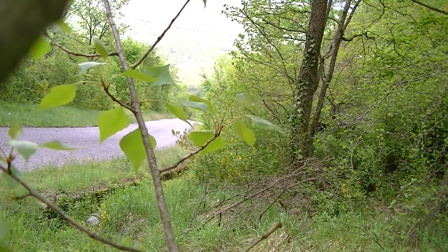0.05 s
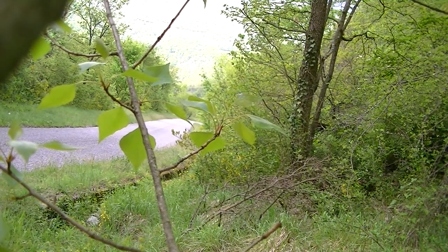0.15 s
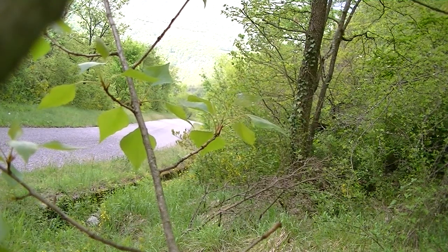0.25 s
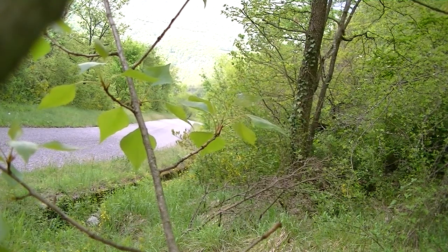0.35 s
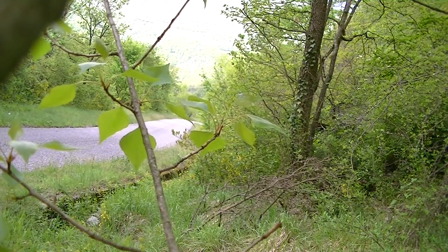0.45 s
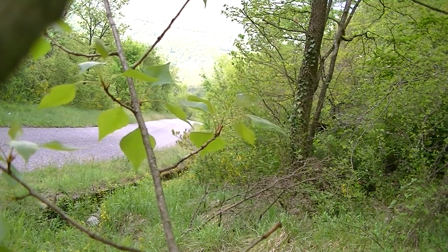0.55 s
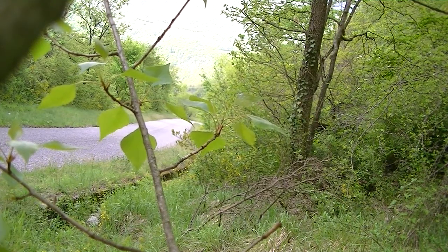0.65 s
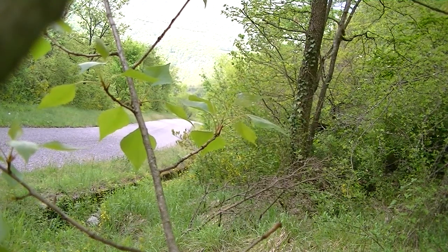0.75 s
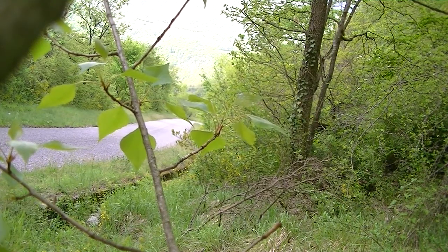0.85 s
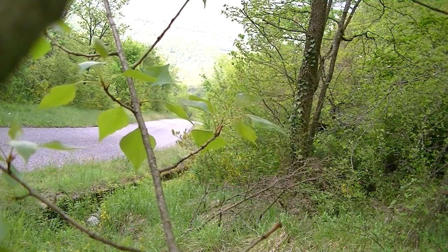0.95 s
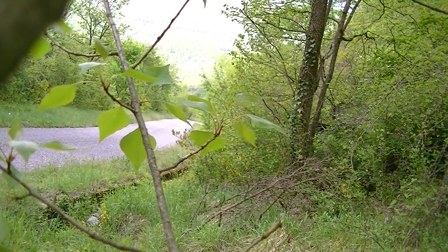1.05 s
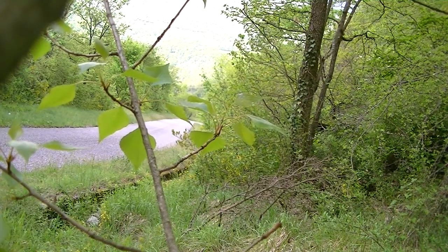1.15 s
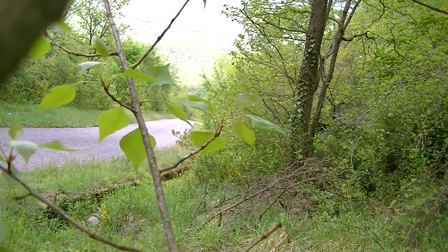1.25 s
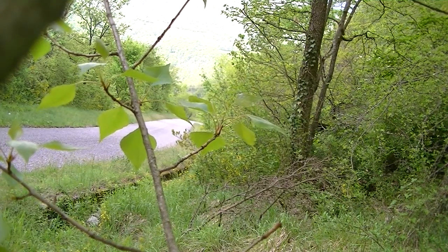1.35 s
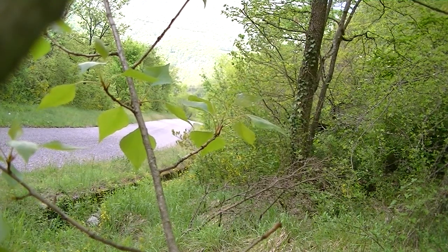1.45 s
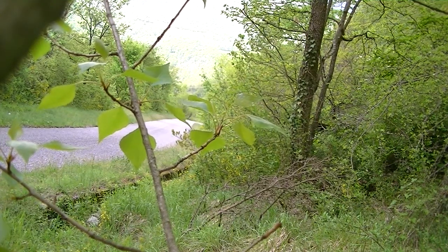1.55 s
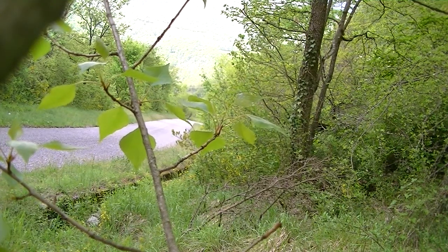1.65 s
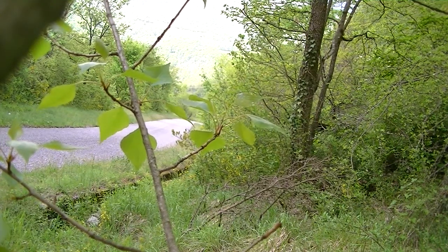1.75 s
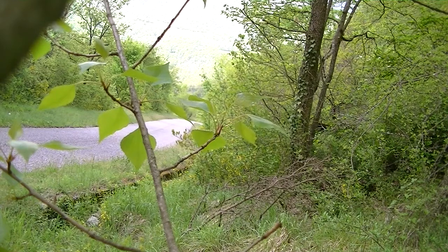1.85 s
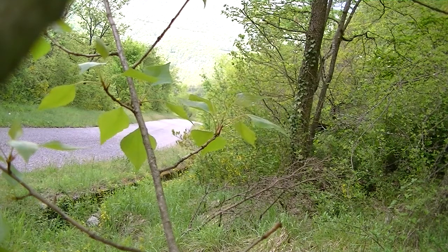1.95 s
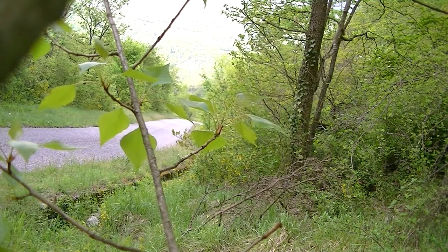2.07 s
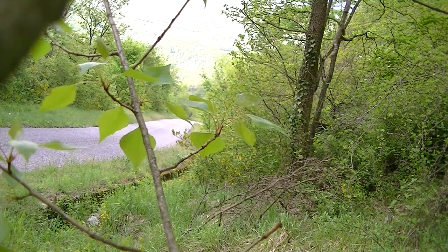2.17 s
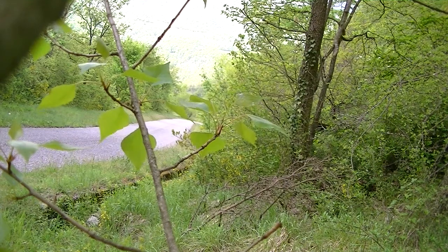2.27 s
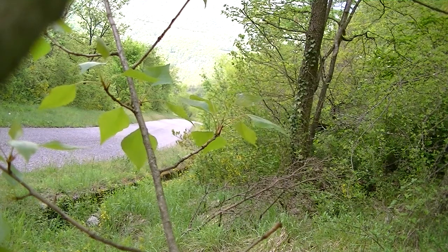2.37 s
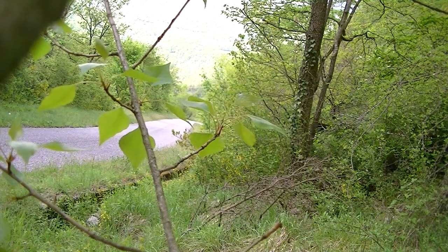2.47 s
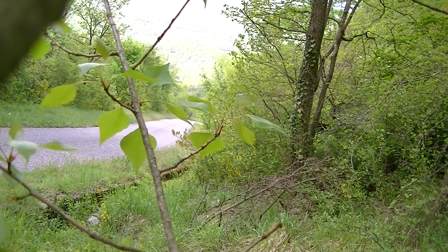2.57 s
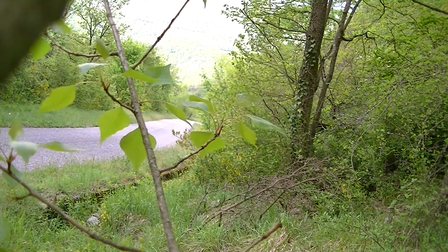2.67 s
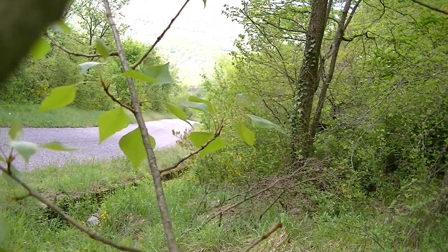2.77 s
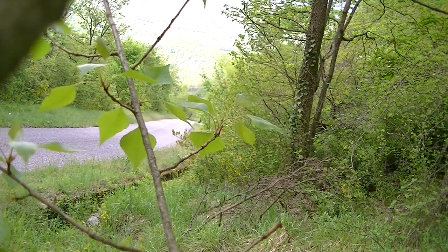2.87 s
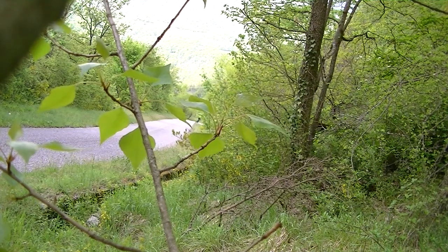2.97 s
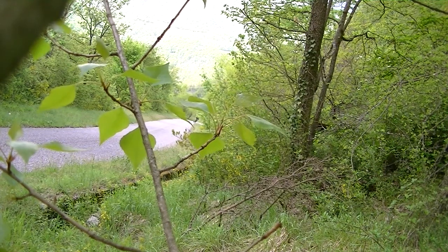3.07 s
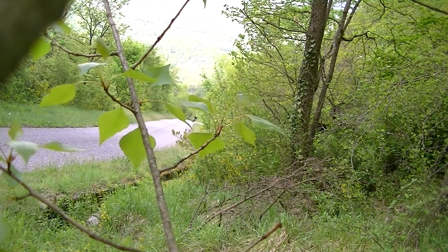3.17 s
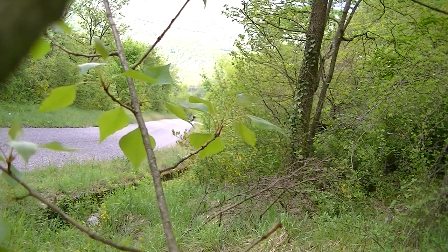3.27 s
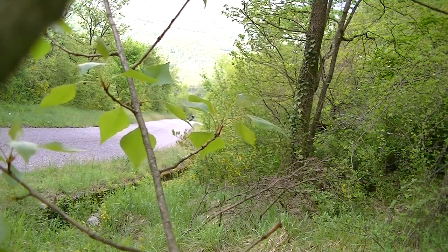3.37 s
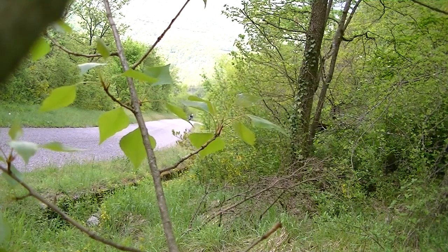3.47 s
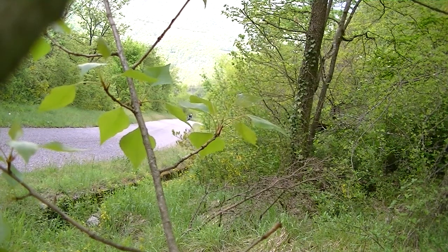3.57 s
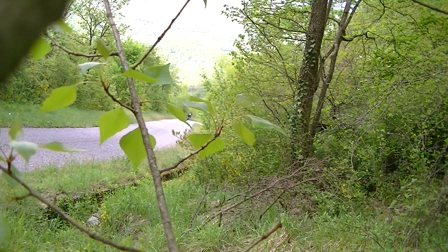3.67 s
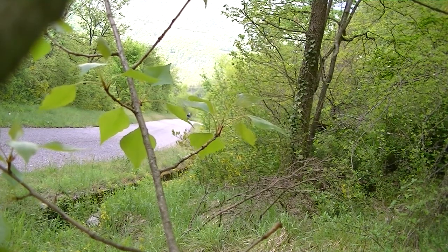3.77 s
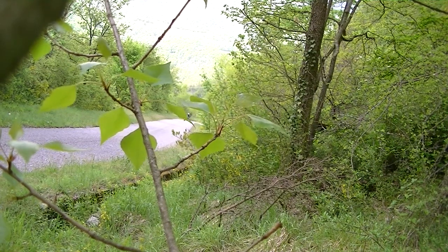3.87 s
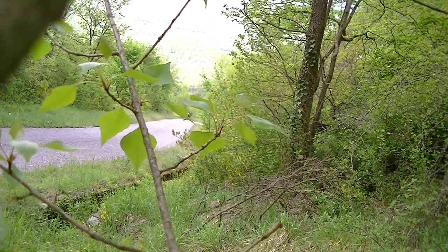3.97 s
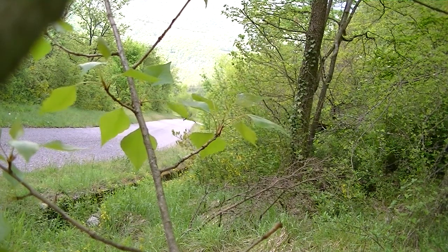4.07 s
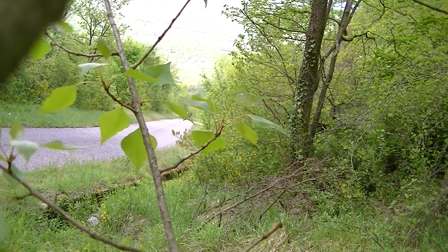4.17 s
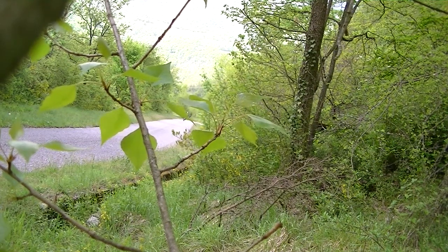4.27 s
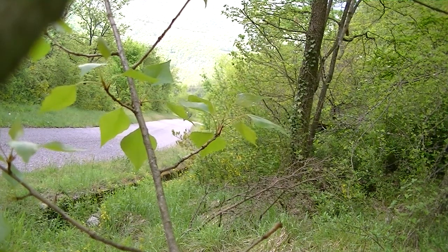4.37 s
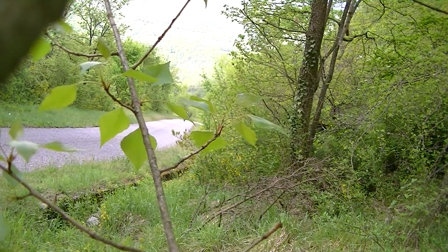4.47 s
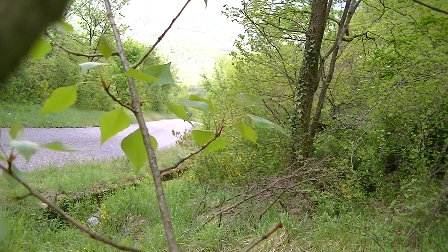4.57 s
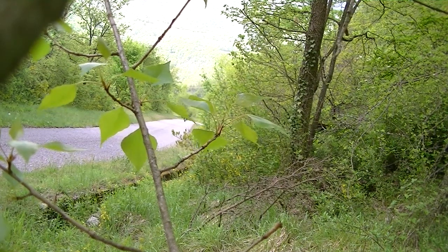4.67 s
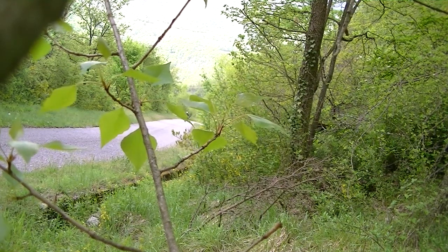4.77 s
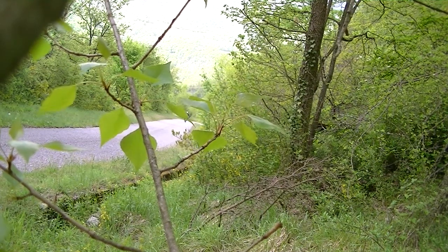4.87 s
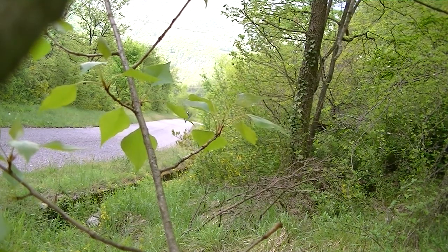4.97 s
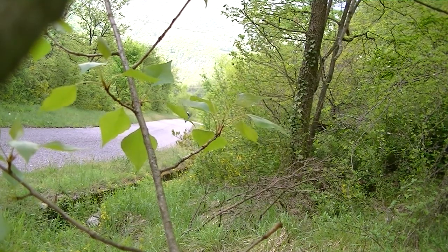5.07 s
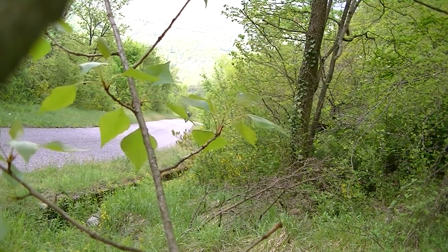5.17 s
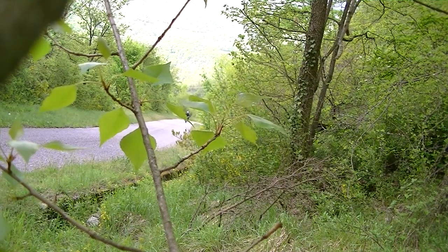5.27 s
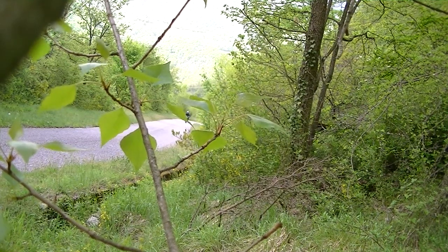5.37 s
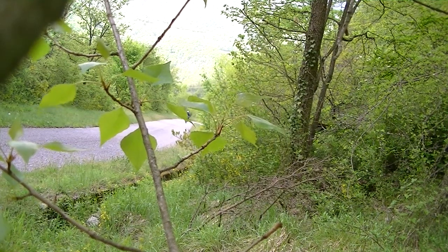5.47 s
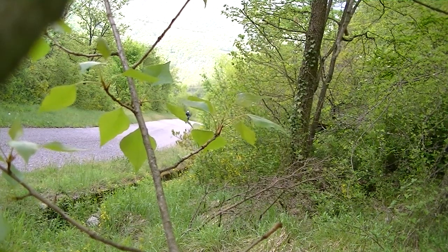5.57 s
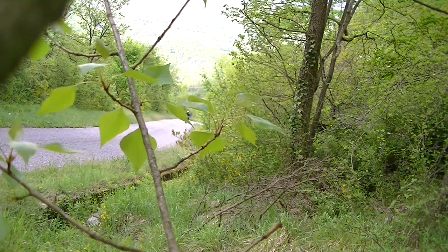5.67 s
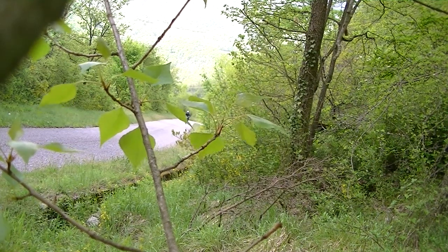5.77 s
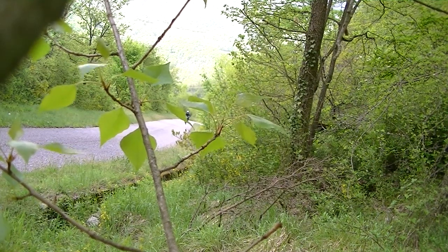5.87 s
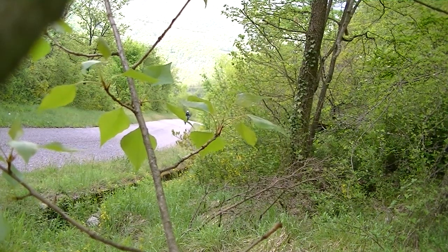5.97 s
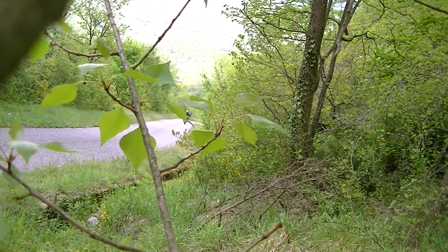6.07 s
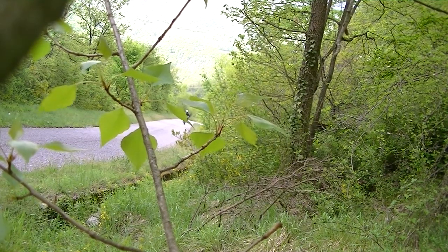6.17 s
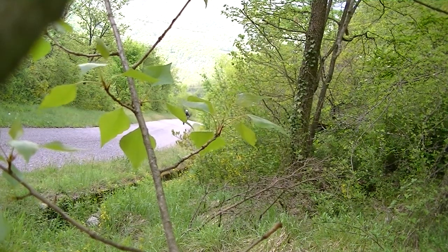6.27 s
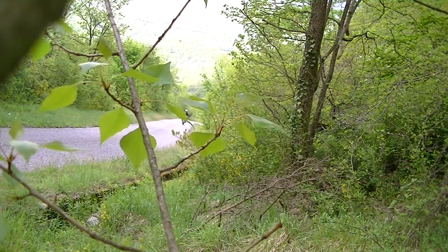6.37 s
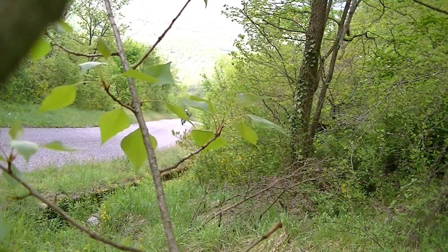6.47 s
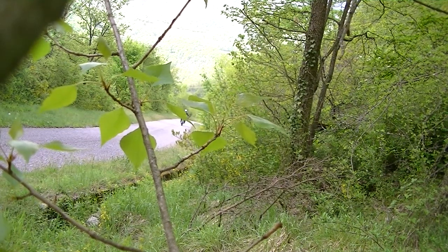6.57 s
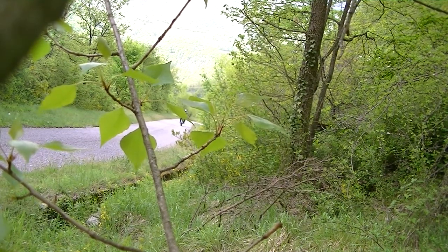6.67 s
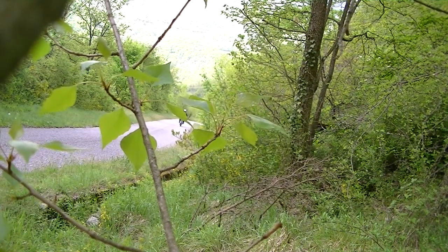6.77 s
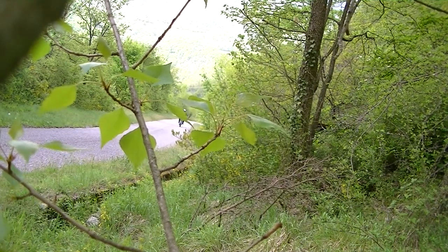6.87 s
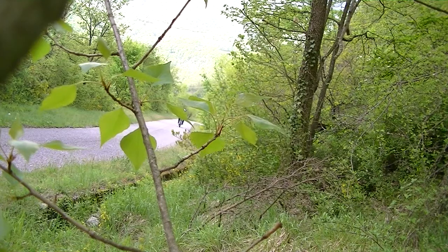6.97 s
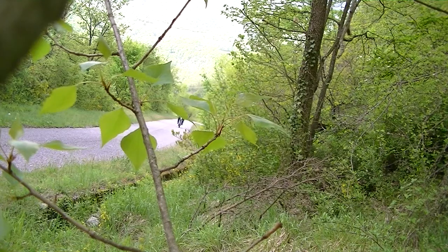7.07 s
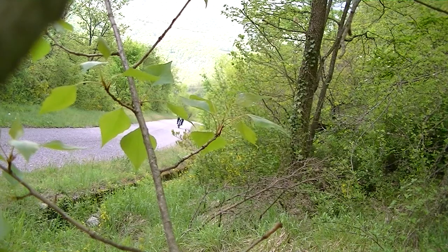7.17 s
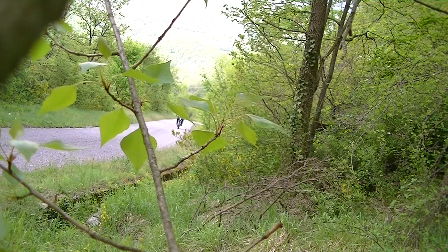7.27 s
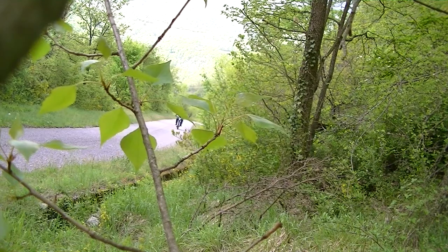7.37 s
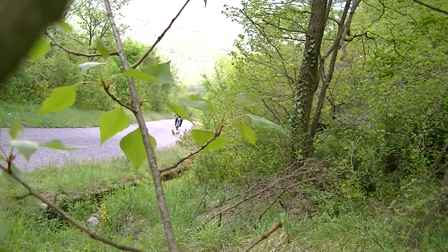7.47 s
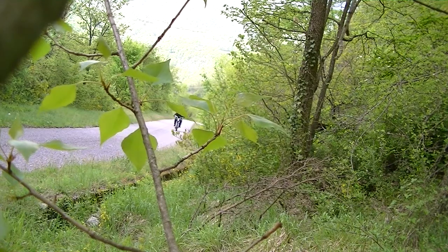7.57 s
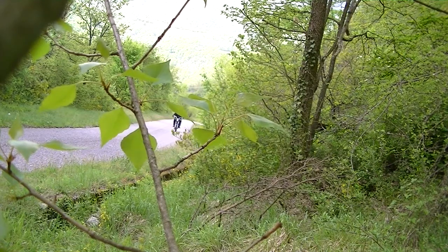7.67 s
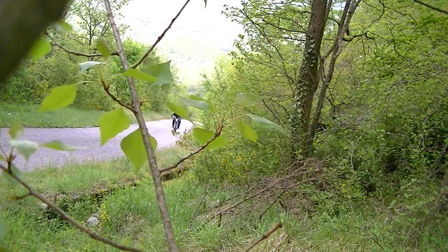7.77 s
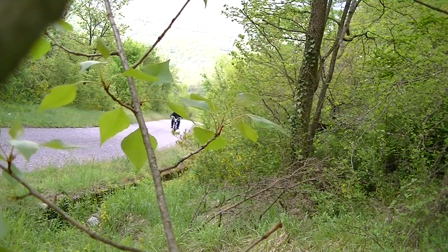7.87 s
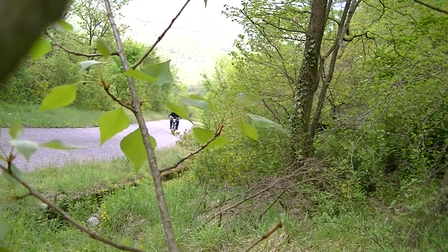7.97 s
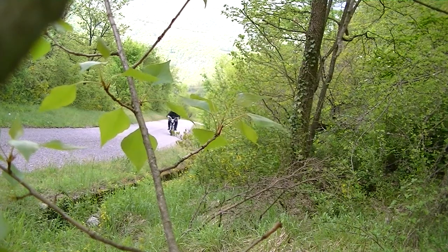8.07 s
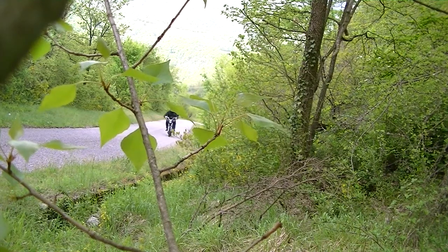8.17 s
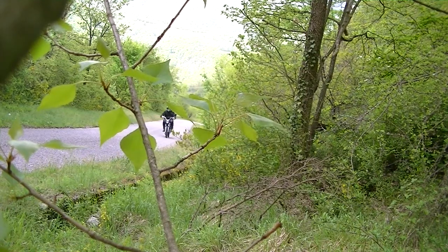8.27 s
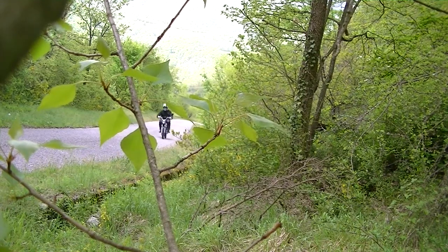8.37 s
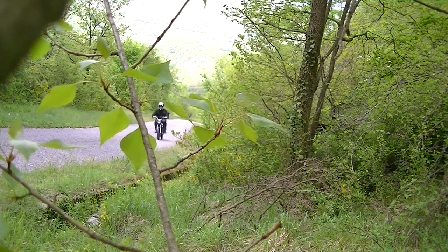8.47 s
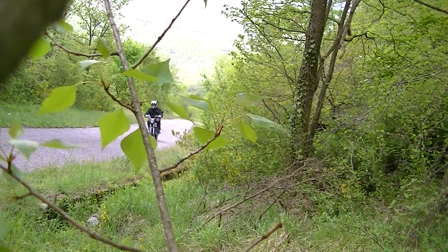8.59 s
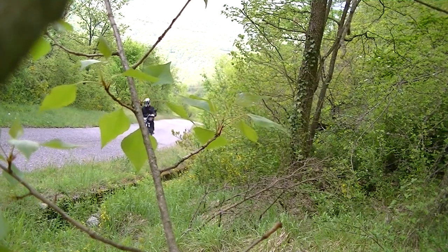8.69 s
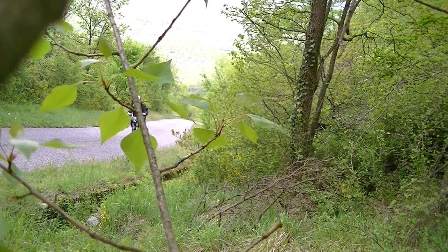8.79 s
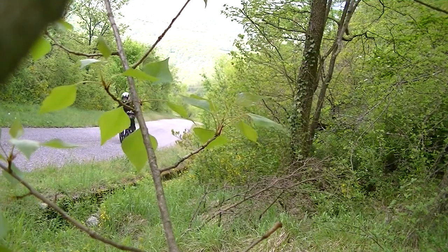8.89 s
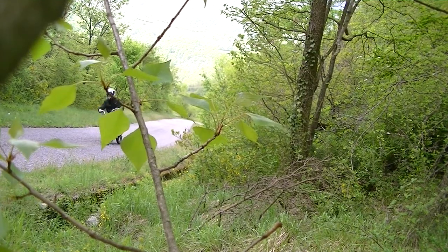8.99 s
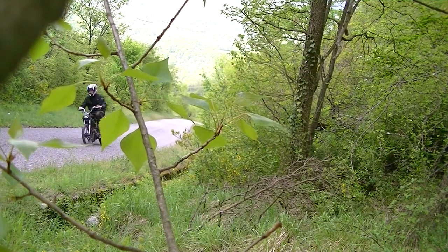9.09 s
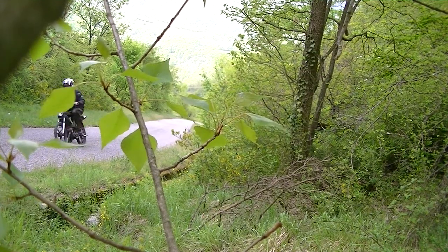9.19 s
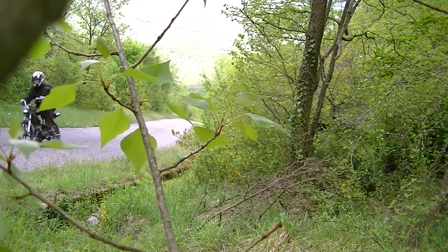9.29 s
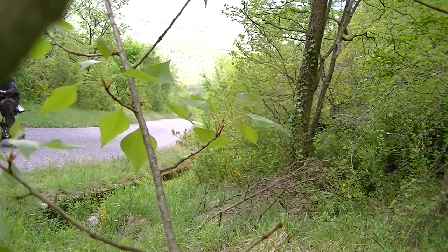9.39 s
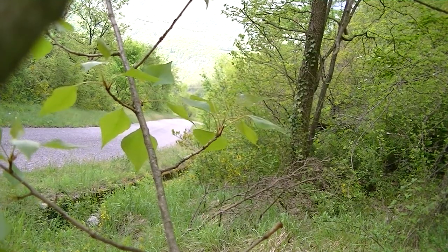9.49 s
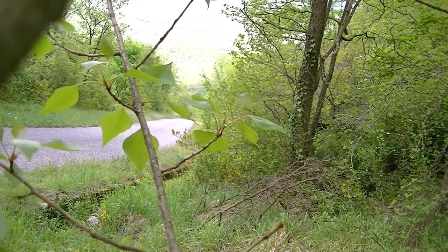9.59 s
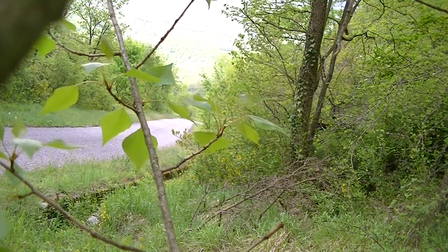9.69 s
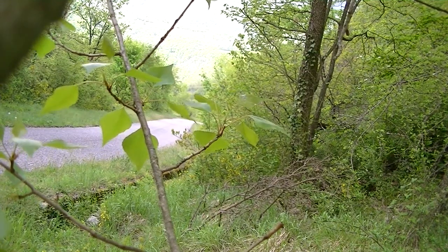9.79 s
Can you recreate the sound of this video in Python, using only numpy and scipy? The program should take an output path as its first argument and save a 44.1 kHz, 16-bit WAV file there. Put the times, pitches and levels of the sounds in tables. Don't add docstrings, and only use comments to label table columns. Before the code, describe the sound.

A small two-stroke moped approaches along a country road, its buzzing whine swelling and brightening through one gear shift, then rasping loudly close by.

```python
import sys
import numpy as np
from scipy import signal
from scipy.io import wavfile
from scipy.ndimage import uniform_filter1d

SR = 44100
rng = np.random.default_rng(int(sys.argv[2]) if len(sys.argv) > 2 else 0)


def persist_wave(psi):
    counts = np.round(np.clip(psi, -1, 1) * 32767).astype(np.int16)
    wavfile.write(sys.argv[1], SR, np.atleast_2d(counts).T)


def how_loud(loudness_db):
    steps = np.asarray(loudness_db, float) / 20
    return 10 ** steps


N = 433503

BEHIND_BEND = [-9, -3, -8, -5, -9, -6, -4, -14, -17, -1, -7, -16, -5, 0, -6, -10, -14, -13, -12, -4, -10,
               -17, -17, -16, -17, -13, -16, -17]
LOW_GEAR = [-11, -5, -7, 0, -1, -3, -7, -12, -12, -2, -9, -12, -9, -6, -9, -3, -13, -15, -14, -16, -7, -16,
            -16, -16, -19, -17, -22, -22]
SHIFTED = [-16, -16, -14, -6, -4, 0, -10, -14, -8, -8, -2, -7, -12, -7, -14, -1, -4, -10, -11, -11, -8, -3,
           -10, -14, -10, -15, -13, -22]
HIGH_GEAR = [-13, -12, -12, -5, -7, -2, -8, -16, -7, -3, -2, -7, -8, -7, -12, -2, -8, -7, 0, -6, 0, -3, -5,
             -16, -8, -10, -2, -14]
HEAD_ON = [-17, -14, -8, -9, -7, -4, -13, -10, -3, -6, 0, -5, -11, -5, -8, -2, -4, -12, -12, -6, -11, -4,
           -9, -8, -15, -18, -10, -19]
ABREAST = [-21, -15, -10, -19, -17, -17, -13, -18, -15, -15, -10, -17, -19, -16, -8, -7, 0, -10, -7, -6, -8,
           -8, -14, -16, -21, -18, -22, -23]
COASTING = [-18, -13, -8, -4, -8, -9, -9, -12, -3, 0, -5, -3, -6, -12, -12, -10, -6, -10, -9, -8, -2, -9,
            -13, -14, -16, -14, -18, -17]
SHUT = [-17, -17, -11, -9, -5, -9, -5, -16, 0, -6, -2, -5, -12, -12, -17, -3, -15, -8, -12, -10, -10, -11,
        -13, -17, -17, -12, -17, -14]
BLIP = [-15, -10, 0, -10, -8, -10, -9, -5, -8, -6, -5, -3, -7, -13, -14, -3, -2, -3, -18, -12, -9, -13, -6,
        -14, -18, -18, -17, -18]
# from t/s, to t/s, order
# pattern, intake roar level/dB
STAGES = [
    (0, 3, BEHIND_BEND, 0),
    (4.5, 5.7, LOW_GEAR, 0),
    (5.8, 6.5, SHIFTED, 0),
    (6.9, 7.5, HIGH_GEAR, 1),
    (7.9, 8.94, HEAD_ON, 0),
    (8.98, 9.33, COASTING, 4),
    (9.36, 9.6, BLIP, 2),
    (9.69, 9.83, ABREAST, 6),
]
# f/Hz, level/dB (per Hz)
RASP_FAR = [(100, -23), (250, -7), (500, 6.5), (1000, 0), (2100, 12), (2500, 9.5), (3200, 10.5), (5500, 5),
            (8500, -0.5), (15500, -21)]
RASP_MID = [(100, -6), (400, -2), (560, 12), (1000, 14.5), (2000, 15.5), (2500, 10.5), (3100, 13),
            (5300, 1), (10300, -12.5), (15500, -32)]
RASP_NEAR = [(100, -27), (400, -7.5), (560, 4.5), (1300, 5.5), (2000, 14.5), (2400, 9.5), (3100, 11),
             (5300, 9.5), (10300, 5.5), (15500, -16)]
RASP_ABREAST = [(100, -44), (400, -12), (600, 0), (1300, -2), (2000, 4), (3000, 2.5), (4500, -4),
                (9000, -7.5), (13500, -11), (15500, -21)]
RASP_AT = [2.4, 4.2, 7.4, 9.3]
# f/Hz, width/Hz, level/dB
FINS = [(5780, 940, 3), (7390, 90, 6), (8070, 490, 2.5), (10300, 1750, 3.5), (11400, 350, 4),
        (12800, 700, 1)]
# t/s, f/Hz
CRUISE = [(0, 170.7), (.76, 170.7), (2.15, 172.7), (2.58, 172.5), (3.6, 173.9), (5.32, 172.8),
          (5.35, 170.4), (5.65, 170.8), (5.84, 164.8), (6.48, 166.6), (7.11, 167.5), (8.22, 168.9),
          (8.42, 165.8), (8.94, 164.7), (9.35, 156.6), (9.47, 154.8), (9.7, 156.5), (9.83, 157.2)]
# shut t/s, open t/s, revs lost f/Hz, depth/0-1
CUTS = [
    (5.652, 5.842, 8.4, 0.88),
    (8.249, 8.36, 9.3, 0.88),
    (8.468, 8.621, 11.6, .85),
    (8.944, 9.356, 9.5, 0.63),
    (9.461, 9.55, 9.2, 0.67),
]
SHUT_DB = dict(first=-25, second=-11, stack=-7.5, rasp=-3.5, hiss=-4, intake=-6.5)
# t/s, exhaust level/dB, bass carried round the bushes level/dB, treble through air and leaves level/dB
APPROACH = [(0, -55, -23, -8.5), (.87, -52, -17.5, -10), (1.75, -50, -10, -9), (2.8, -45.5, -9, -7),
            (3.5, -40.5, -14, -9), (3.9, -37, -16, -10), (4.3, -35.5, -20.5, -11), (4.6, -35, -17, -12),
            (5.05, -34, -17.5, -11), (5.6, -33.5, -16, -3.5), (5.95, -32, -19, -5.5),
            (6.45, -30.5, -16.5, -9.5), (7.35, -25.5, -22, -4.5), (8.2, -22, -19.5, -6.5),
            (8.9, -21, -20, -2.5), (9.3, -18.5, -23, -1.5), (9.62, -22, -20, 0), (9.83, -24.5, -22, -1.5)]
# t/s, level/dB
SONG = [(.5, -1.5), (1.6, 1), (3.1, -0.5), (3.5, 4), (5.5, 2), (5.95, 4.5), (6.45, 1.8), (9.5, 1.5),
        (9.75, 7.5)]
# t/s, level/dB
SECOND = [(.9, -19.5), (2.3, -10.5), (4.2, -18.5), (4.6, -14.5), (5.5, -18), (6.2, -24.5), (7.3, -24.5),
          (9.4, -24), (9.7, -17.5)]
# t/s, length/s, start f/Hz, end f/Hz, level/dB
NOTES = [(1.095, .085, 2980, 3660, -53.5), (1.165, .065, 3550, 4300, -56), (1.223, .02, 4700, 4250, -52),
         (1.28, .02, 4600, 4600, -63.5), (1.345, 0.026, 3420, 3030, -44.5), (1.39, .025, 3190, 3200, -52),
         (1.434, .07, 5480, 5400, -50.5), (1.53, 0.01, 4500, 4200, -50), (1.542, .02, 3950, 3480, -46),
         (1.599, .012, 3900, 3950, -44), (1.617, .04, 4080, 4220, -45), (1.693, .012, 4800, 4200, -46),
         (1.7, 0.018, 4180, 3400, -48), (1.733, 0.016, 4120, 4100, -48), (2.41, .015, 4800, 4900, -51),
         (2.455, .015, 4980, 4550, -46), (2.472, 0.024, 4720, 4400, -45), (2.535, 0.023, 5250, 5000, -46.5),
         (2.595, .02, 5000, 4840, -48)]
# t/s, half length/s, level/dB
GUSTS = [
    (2.0, .3, -75),
    (2.85, .35, -69),
    (3.493, 0.31, -55.5),
    (4.2, 0.36, -61),
    (5.2, 0.55, -58.5),
    (6.35, 0.55, -58.5),
    (7.502, 0.34, -64),
    (8.2, 0.24, -63),
    (8.9, .35, -66),
]
# t/s, peak level/dB, f/Hz
BUMPS = [
    (3.429, -42, 125),
    (3.559, -54, 125),
    (3.595, -30, 126),
    (4.219, -37, 125),
    (4.269, -38, 125),
    (5.201, -34, 126),
    (5.357, -29, 125),
    (6.329, -47, 125),
]
# f/Hz, level/dB
INSECT = [(7800, -74.5)]
# f/Hz, level/dB (per Hz)
AIR = [(18, -59), (30, -31), (108, -31), (168, 5), (219, 2), (1200, 10), (2360, 4), (2830, 5.5), (8060, -7),
       (15500, -12.5)]
AIR_DB = -51.5

SAG_S, PICKUP_S = .028, .035
LEAD_S, CLOSE_S, LAG_S, SNAP_S, BOOM_EARLY_S = 0.0011, 0.032, 0.0092, 0.022, 0.045
BITE_DB, BITE_S = 1.5, 0.035
BARK_DB = 1.5
CALM_DB = -92


def moped():
    t = np.arange(N) / SR
    s, *columns = np.transpose(APPROACH)
    level, bass, treble = (np.interp(t, s, db) for db in columns)
    closed, slack = shut(t), shut(t, BOOM_EARLY_S)
    moving = 4 * np.clip(closed * (1 - closed), 0, 1)
    turns = np.cumsum(revs(t)) / SR

    sway, beat = wander(8.5, count=2)
    first_db = level + bass + SHUT_DB["first"] * slack + (0.8 + 3.0 * slack) * sway
    second_db = level + along(t, SECOND) + SHUT_DB["second"] * slack + (2.5 + 2.1 * slack) * beat
    boom = how_loud(first_db) * np.cos(2 * np.pi * turns)
    boom = boom + how_loud(second_db) * np.cos(4 * np.pi * turns + 1)

    stack = how_loud(level + along(t, SONG) + SHUT_DB["stack"] * closed + bite(t)) * orders(turns)

    puff = np.cos(2 * np.pi * turns)
    gust, rattle = wander(14, count=2)
    rasp = noise(lambda hz, t: colour(hz, t, False), patchy_db=0.5, streaky_db=1.16)
    rasp = rasp * how_loud(level + SHUT_DB["rasp"] * closed + BARK_DB * moving)
    rasp = rasp * (1 + 0.13 * puff) * how_loud(0.5 * gust)
    hiss = noise(lambda hz, t: colour(hz, t, True), patchy_db=1.04, streaky_db=3.04)
    hiss = hiss * how_loud(level + treble + SHUT_DB["hiss"] * closed + 0.43 * bite(t))
    hiss = hiss * (1 + 0.12 * puff) * how_loud(0.15 * rattle + 0.54 * gust)
    return np.sqrt(2) * boom + stack + rasp + hiss


def orders(turns, flicker_db=2.5, spread=.9):
    hop = 32
    t, ks = np.arange(0, N + hop, hop) / SR, np.arange(3, 31)
    db = np.array([staged(t, row) for row in np.transpose([stage[2] for stage in STAGES])])
    closed = np.clip(3 * shut(t) - 1.8, 0, 1)
    db = db * (1 - closed) + np.array(SHUT)[:, None] * closed
    fading_db = np.interp(t, [3, 5.5], [4.5, 1.8])
    db = db + fading_db * wander(5, count=28, size=len(t))
    db = db + flicker_db * wander(35, count=28, size=len(t))
    gain = how_loud(db) / np.linalg.norm(how_loud(db), axis=0) * np.sqrt(2)

    unsteady = np.interp(t, [8.2, 8.4], [.028, .038])
    slip = unsteady * ks[:, None] * wander(35, count=28, size=len(t))
    scatter = 1 - np.outer(ks > 10, np.interp(t, [9.5, 9.6], [.4, .7]))
    scatter = scatter - np.outer(ks <= 10, np.interp(t, [8.9, 9.0], [.55, 0]))
    lag = np.pi + slip + scatter * spread * np.pi * rng.uniform(-1.0, 1, (28, 1))

    burns = how_loud(1.1 * rng.standard_normal(2000))[turns.astype(int)]
    burns = uniform_filter1d(burns, size=60)
    return summed(turns, gain * np.exp(1j * lag), hop) * evened(burns)


def summed(turns, gains, hop):
    pointer = np.exp(2j * np.pi * (turns % 1)).astype(np.complex64)
    power, out = pointer ** 2, np.zeros(N)
    for gain in gains.astype(np.complex64):
        power = power * pointer
        out += (np.repeat(gain, hop)[:N] * power).real
    return out


def colour(hz, t, treble):
    colours = [read(c, hz) for c in (RASP_FAR, RASP_MID, RASP_NEAR, RASP_ABREAST)]
    db = np.array([np.interp(t, RASP_AT, row) for row in np.transpose(colours)])
    for f, width, peak_db in FINS:
        db = db + peak_db * np.exp(-(2 * (hz[:, None] - f) / width) ** 2)
    intake = np.exp(-((hz[:, None] - 3600) / 1200) ** 2)
    db = db + intake * (staged(t, [stage[3] for stage in STAGES]) + SHUT_DB["intake"] * shut(t))
    high = np.clip((hz[:, None] - 4400) / 1400, 0, 1)
    return how_loud(db) * np.sqrt(high if treble else 1 - high)


def revs(t):
    rate = along(t, CRUISE)
    for a, b, lost_hz, _ in CUTS:
        sag = 1 - np.exp(-np.clip(t - a, 0, b - a) / SAG_S)
        rate = rate - lost_hz * sag * np.exp(-np.maximum(t - b, 0) / PICKUP_S)
    return rate


def shut(t, early_s=0):
    out = 0
    for a, b, _, depth in CUTS:
        closing = np.clip((t - a + LEAD_S) / CLOSE_S + .5, 0, 1)
        opening = np.clip((b + LAG_S - early_s - t) / SNAP_S + 1, 0, 1)
        out = out + depth * closing * opening
    return out


def bite(t):
    return sum(BITE_DB * np.exp(-((t - b - LAG_S - SNAP_S) / BITE_S) ** 2) for _, b, _, _ in CUTS)


def staged(t, values):
    return np.interp(t, np.ravel([row[:2] for row in STAGES]), np.repeat(values, 2))


def bird():
    out = np.zeros(N)
    for s, length, from_hz, to_hz, db in NOTES:
        n = round(length * SR)
        waver = 27.0 * uniform_filter1d(rng.standard_normal(4000), size=40)[:n] * 6
        glide = np.linspace(from_hz, to_hz, n) + waver
        tone = np.sin(2 * np.pi * np.cumsum(glide) / SR)
        out[round(s * SR):][:n] += how_loud(db) * np.sqrt(2) * tone * signal.windows.tukey(n, .5)
    tail_t = np.arange(SR // 3) / SR
    tail = rng.standard_normal(SR // 3) * how_loud(-60 * tail_t / .6)
    return out + how_loud(-1.5) * signal.oaconvolve(out, tail / np.linalg.norm(tail))[:N]


def wind():
    t = np.arange(N) / SR
    band = signal.butter(3, [75, 140], "band", fs=SR, output="sos")
    rumble = signal.sosfilt(band, rng.standard_normal(N))
    rumble = evened(rumble * how_loud(2.6 * wander(7.8, count=1)[0]))
    swell = how_loud(CALM_DB) + sum(how_loud(db) * np.exp(-((t - s) / half) ** 2) for s, half, db in GUSTS)
    deep_band = signal.butter(2, [30, 75], "band", fs=SR, output="sos")
    deep = signal.sosfilt(deep_band, rng.standard_normal(N))
    out = how_loud(-88) * evened(deep) + rumble * swell
    for s, db, hz in BUMPS:
        u = np.arange(-1000, 1000) / SR * hz
        bump = np.sin(2 * np.pi * u) * np.exp(-(u / 0.32) ** 2)
        out[round((s + .004) * SR) - 1000:][:2000] += how_loud(db - 3) * bump
    return out


def insect():
    (hz, db), = INSECT
    flutter, drift = wander(30, count=2)
    return how_loud(db + 4.5 + 3.0 * flutter) * np.sin(2 * np.pi * np.cumsum(hz + 8.0 * drift) / SR)


def air():
    return how_loud(AIR_DB) * noise(lambda hz, t: how_loud(read(AIR, hz))[:, None], patchy_db=1.3, streaky_db=0.5)


def noise(field, patchy_db, streaky_db):
    frames = N // 256 + 5
    hz, t = np.fft.rfftfreq(1024, 1 / SR), np.arange(frames) * 256 / SR
    a, b, patches, streaks = rng.standard_normal((frames, 513, 4), dtype=np.float32).T
    patches = evened(uniform_filter1d(uniform_filter1d(patches, size=8, axis=0), size=16, axis=1))
    streaks = evened(uniform_filter1d(uniform_filter1d(streaks, size=2, axis=0), size=40, axis=1))
    gain = field(hz, t)
    gain = gain / np.linalg.norm(gain, axis=0)
    z = (a + 1j * b) * gain * how_loud(patchy_db * patches + streaky_db * streaks)
    return evened(signal.istft(z, nperseg=1024, noverlap=768)[1][:N])


def wander(rate, count, size=N):
    knots = rng.standard_normal((count, 400))
    at = np.linspace(0, rate * N / SR, size)
    return np.array([np.interp(at, np.arange(len(k)), k) for k in knots])


def along(t, points):
    return np.interp(t, *np.transpose(points))


def read(points, hz):
    f, value = np.transpose(points)
    return np.interp(np.log(hz + 1), np.log(f + 1), value)


def evened(x):
    return x / np.sqrt(np.mean(x ** 2) + 1e-20)


def scene():
    return np.tile(moped() + bird() + wind() + insect() + air(), (2, 1))


def low_pass(x):
    return signal.sosfilt(signal.butter(12, 15830, fs=SR, output="sos"), x)


def record(dry):
    rounded = np.tanh(dry[0])
    thin = signal.sosfilt(signal.butter(2, 50, "high", fs=SR, output="sos"), rounded)
    edge = signal.firwin(511, 15700, window=("kaiser", 9), fs=SR)
    mix = np.tile(signal.oaconvolve(thin, edge, "same"), (2, 1))
    return low_pass(mix)


dry = scene()
out = record(dry)
persist_wave(out)
```